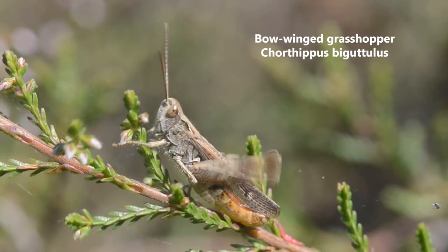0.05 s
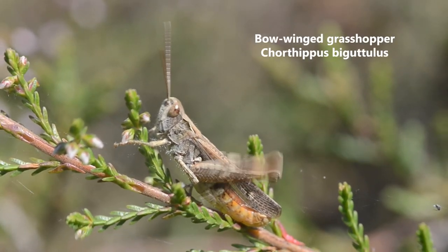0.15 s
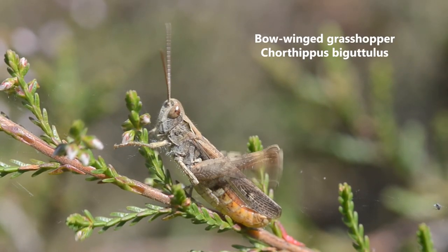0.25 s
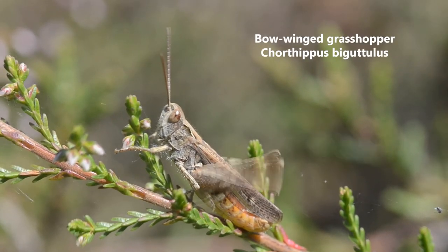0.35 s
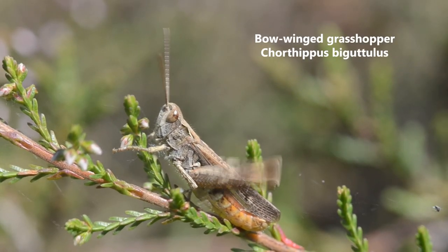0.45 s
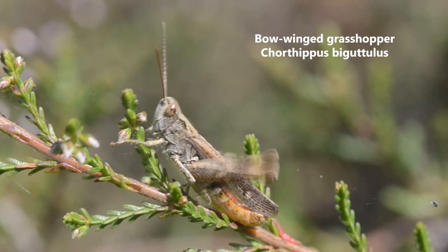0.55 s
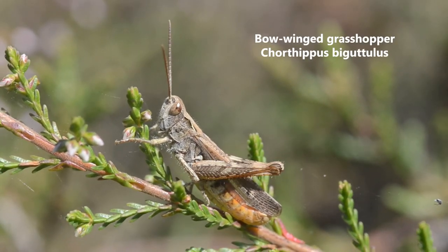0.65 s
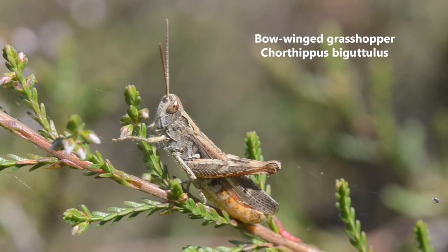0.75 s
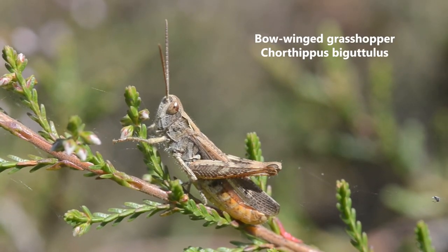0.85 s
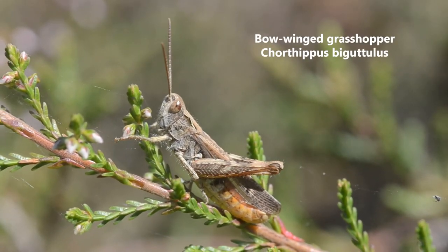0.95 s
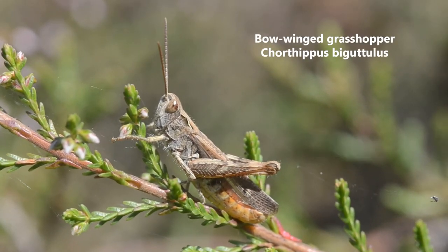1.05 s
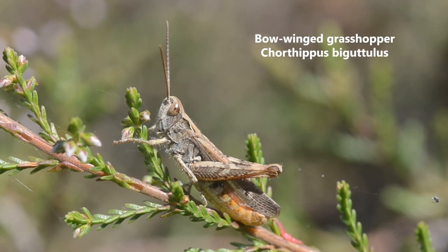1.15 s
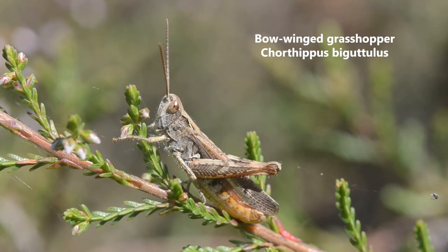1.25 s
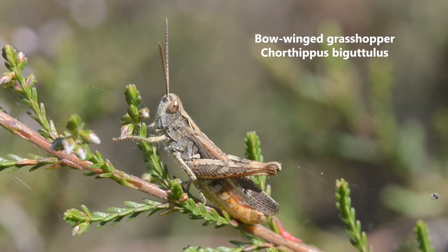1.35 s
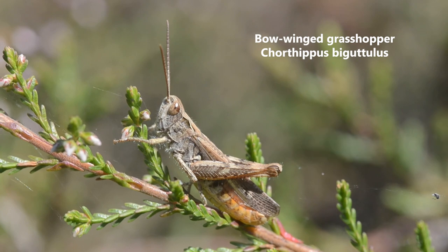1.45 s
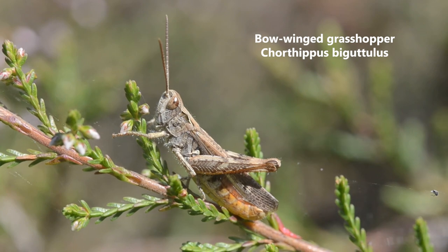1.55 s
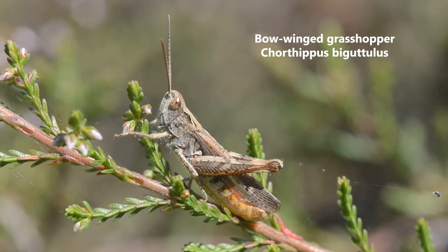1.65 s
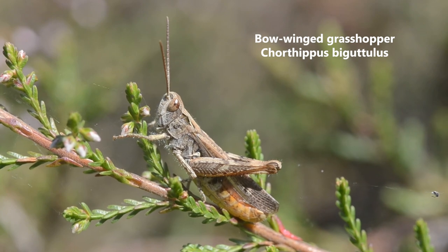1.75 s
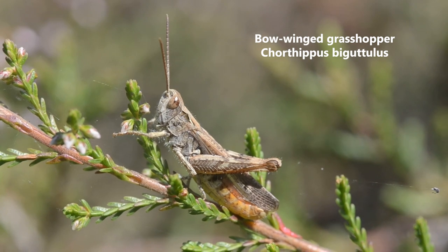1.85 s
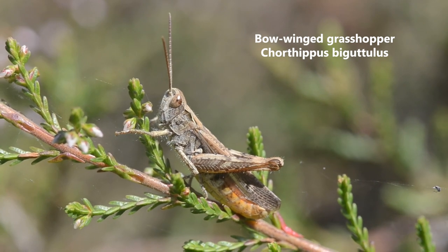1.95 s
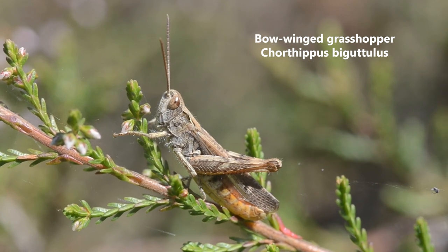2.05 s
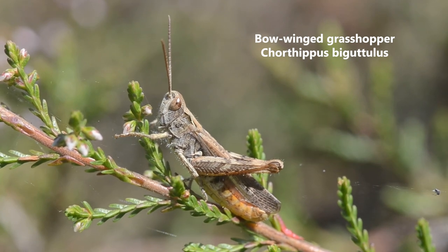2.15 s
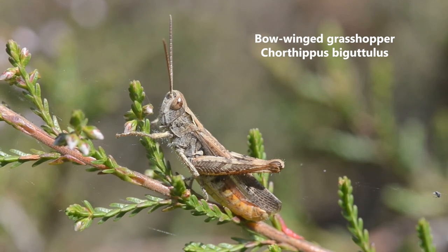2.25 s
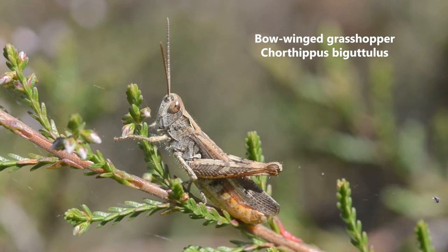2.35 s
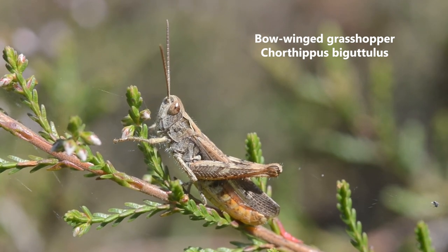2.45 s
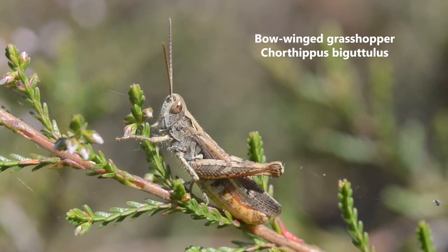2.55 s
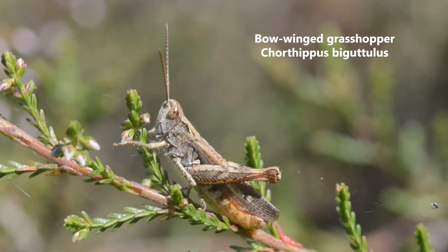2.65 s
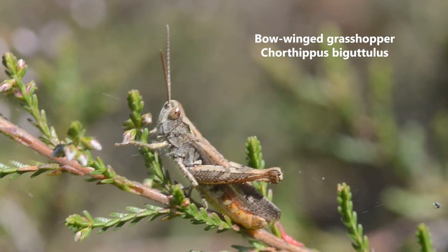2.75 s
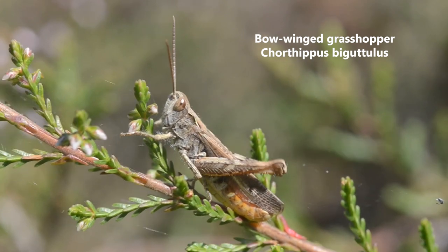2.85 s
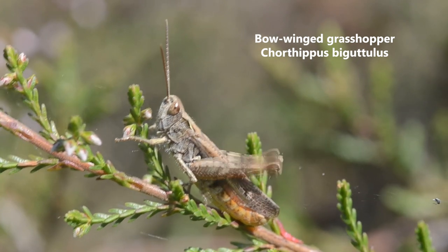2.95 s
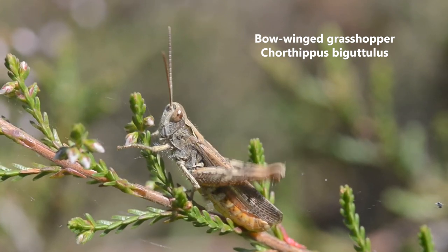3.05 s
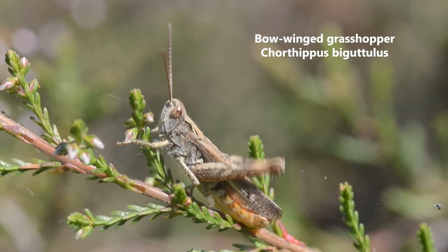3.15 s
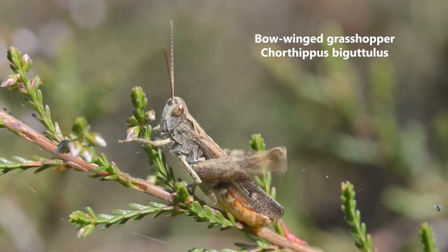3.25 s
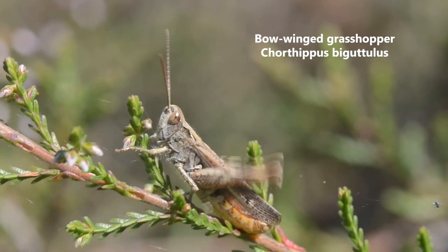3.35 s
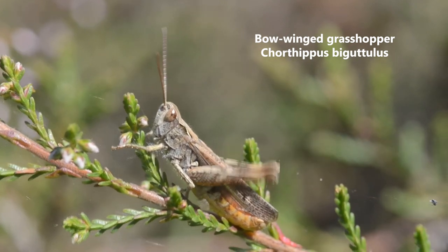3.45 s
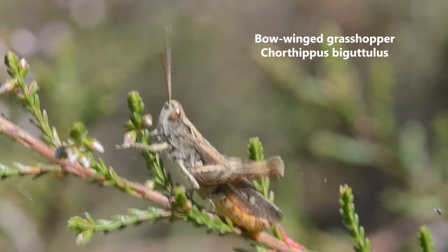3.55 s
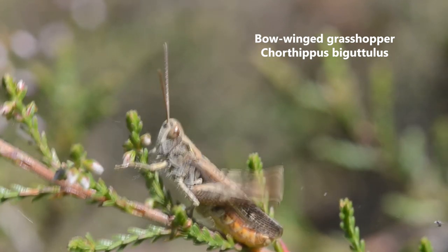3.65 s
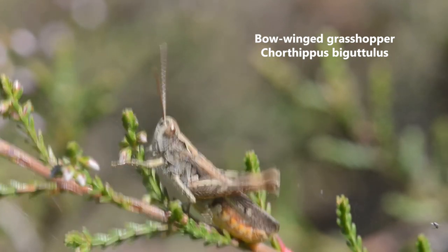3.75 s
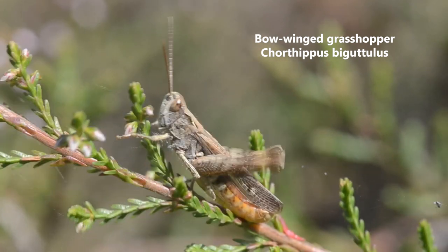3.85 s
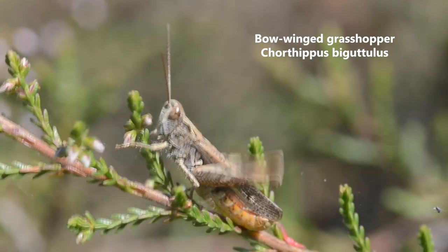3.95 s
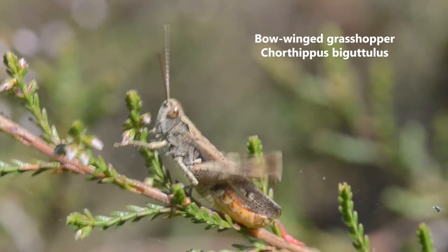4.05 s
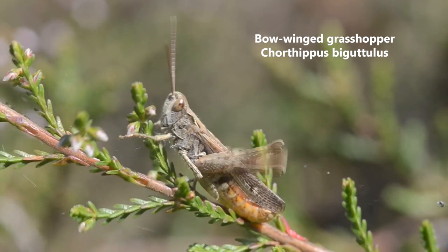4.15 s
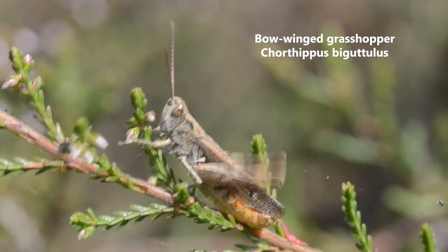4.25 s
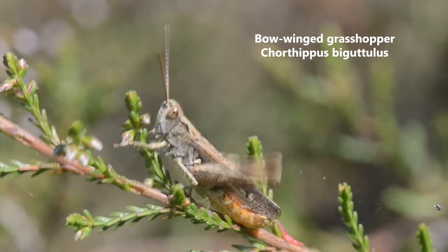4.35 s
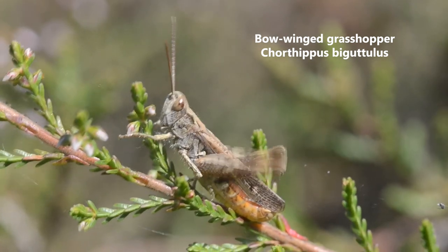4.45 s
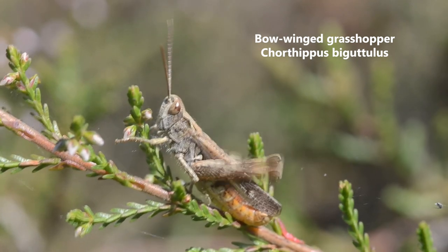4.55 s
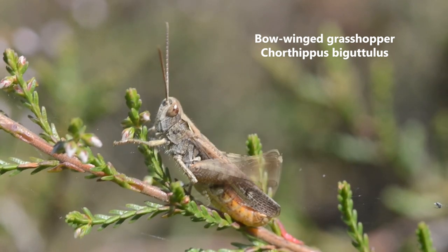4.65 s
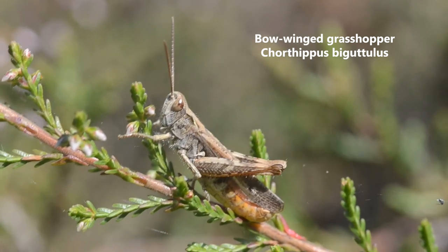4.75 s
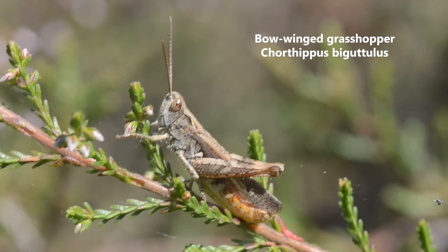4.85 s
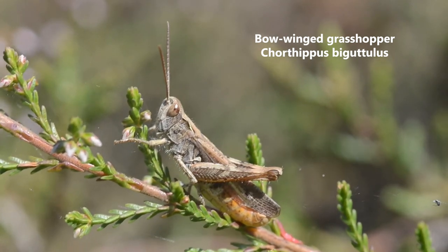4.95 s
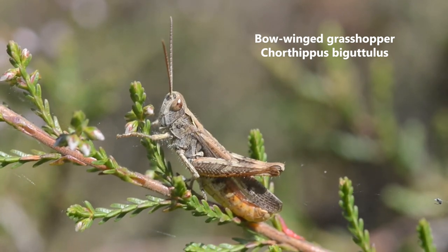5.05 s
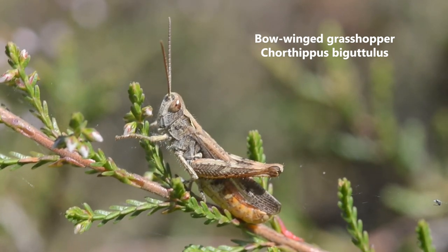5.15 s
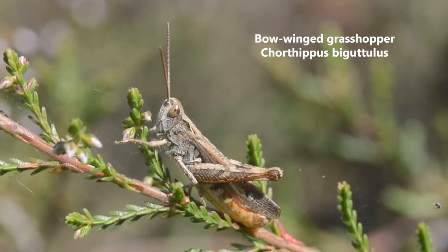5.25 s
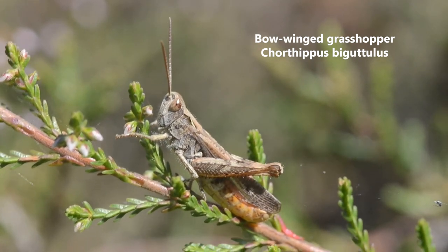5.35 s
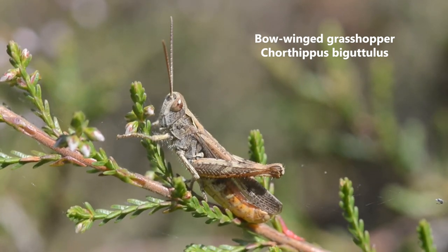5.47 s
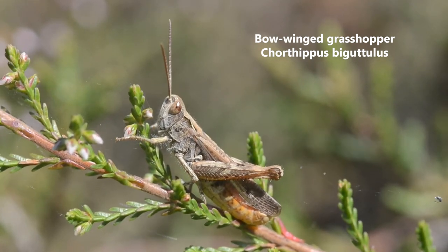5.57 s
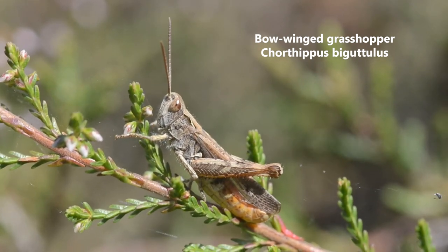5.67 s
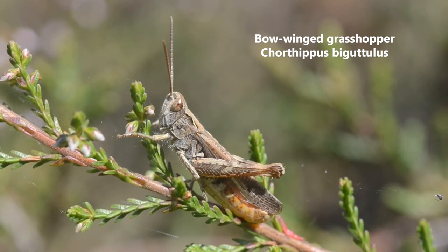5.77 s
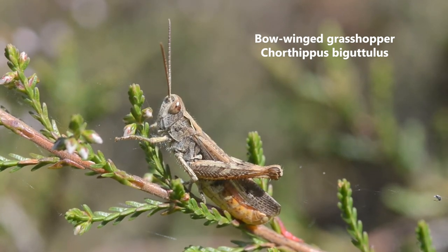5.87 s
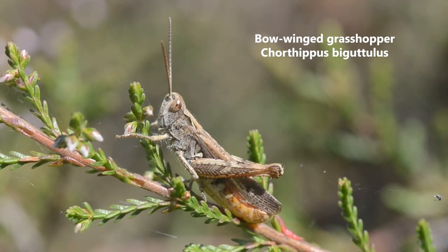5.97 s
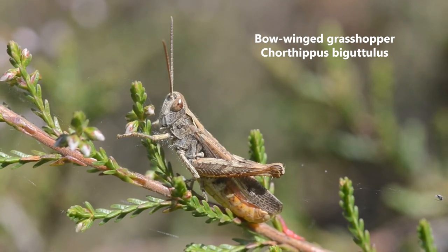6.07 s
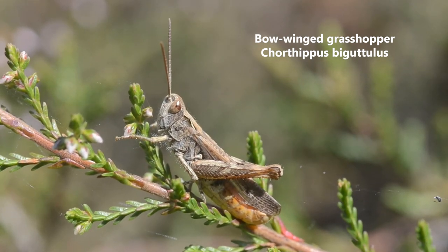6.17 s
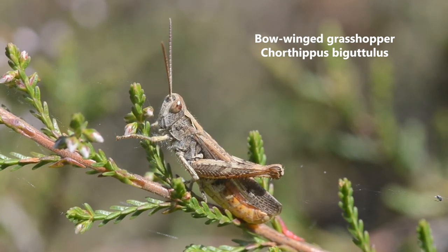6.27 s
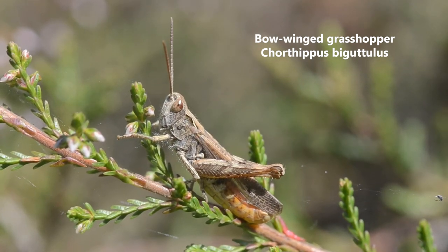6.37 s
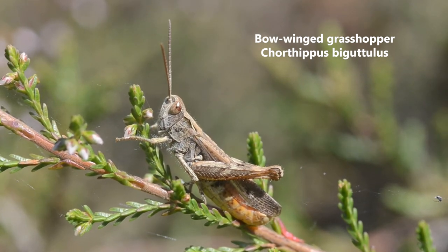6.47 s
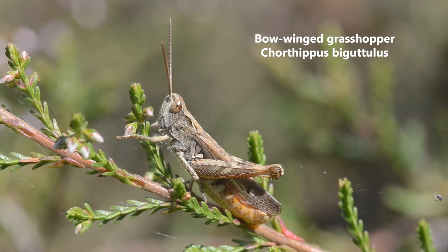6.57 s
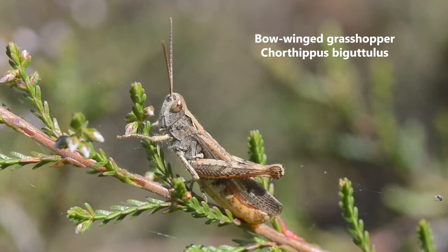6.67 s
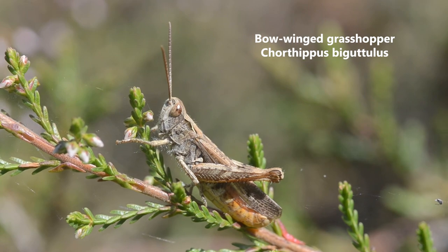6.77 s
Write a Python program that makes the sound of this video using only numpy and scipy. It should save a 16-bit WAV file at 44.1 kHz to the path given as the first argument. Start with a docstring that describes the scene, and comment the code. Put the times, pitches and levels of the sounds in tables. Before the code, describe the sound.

Dry, high pulsing grasshopper song outdoors: the tail of one phrase, a quiet gap, then another growing from faint scratches to a hard buzz.

```python
"""First heard is the end of a close grasshopper's phrase; a second phrase then swells and stops dead.
Stridulation: hind-leg pegs rub the wing veins, one hard whistle a syllable and then lighter scratches,
played by two legs slightly out of step. A rival nearby outlasts the first phrase by the same mechanism.
Faint neighbours and a distant chorus (shaped noise), a bird's falling sine and two damped low knocks
come from across the heath, over the steady stereo hiss and low rumble of filtered noise."""
import sys
import numpy as np
from scipy import signal
from scipy.fft import rfft, irfft, next_fast_len
from scipy.io import wavfile
from scipy.ndimage import uniform_filter1d, map_coordinates

SR = 44100
rng = np.random.default_rng(int(sys.argv[2]) if len(sys.argv) > 2 else 0)


def unload_wav(signal):
    """Save mono or channel-first audio to the path in sys.argv[1] as 16-bit WAV at rate SR, clipped to [-1, 1]."""
    wavfile.write(
        sys.argv[1],
        SR,
        np.round(np.clip(np.atleast_2d(signal).T, -1, 1) * 32767).astype(np.int16),
    )


N = 300321


def amp(db):
    """Decibel law: a level in dB as an amplitude ratio."""
    return 10 ** (np.asarray(db) / 20)


def unit(x, axis=None):
    """Normalisation by effective value: x scaled to rms 1."""
    return x / np.sqrt(np.mean(x ** 2, axis=axis, keepdims=True) + 1e-20)


def along(points, hz):
    """Logarithmic frequency scale: (frequency [Hz], value) points interpolated at hz."""
    f, v = np.transpose(points)
    return np.interp(np.log(hz + 1), np.log(f + 1), v)


def wobble(rate):
    """Slow random modulation: a smooth curve through rate random knots a second."""
    knots = rng.standard_normal(int(N * rate / SR) + 4)
    return map_coordinates(knots, [np.arange(N) * rate / SR])


def filtered(x, response):
    """Linear filtering: the spectrum of x times a complex response of frequency."""
    m = next_fast_len(N + SR // 2)
    return irfft(rfft(x, m) * response(np.fft.rfftfreq(m, 1 / SR)), m)[..., :N]


def placed(starts, sounds):
    """Superposition: the rows of sounds add, each beginning at its own time."""
    index = np.round(starts * SR).astype(int)[:, None] + np.arange(sounds.shape[1])
    inside = (index >= 0) & (index < N)
    return np.bincount(index[inside], sounds[inside], N)


# phrases sung with both legs: (start [s], end of light strokes [s], number of syllables,
# syllable period at full pace [s], lengthening at the end [s])
PHRASES = [(-1.1438, .623, 30, .05774, .00425), (2.9676, 4.727, 30, .05728, .00782)]
# trailing leg against the leading one, one row a phrase: (level [dB])
SECOND_LEG_DB = [-6, -4.5]


def grasshopper():
    """Superposition in time: the close singer's phrases add up to the main song."""
    return sum(phrase(*row, second_db) for row, second_db in zip(PHRASES, SECOND_LEG_DB))


# extra period at the start [s]; time constants of quickening and flagging [syllables]
SLOW_START_S, WARM_SYLLABLES, TIRE_SYLLABLES = .00506, 4.384, 3.602
SWELL_SYLLABLES = 17.2  # growth to full force [syllables]
# full level [dB], how much softer the start is [dB], bend of the swell, loss when tired [dB]
ACCENT_DB, ACCENT_SWELL_DB, ACCENT_BEND, ACCENT_TIRED_DB = -33, 25, 3.1, 1.5
LIGHT_DB, LIGHT_SWELL_DB, LIGHT_BEND, LIGHT_TIRED_DB = -38, 23, 2.6, 2.2
# reference peg rate after the swell, and how much lower a phrase starts [Hz]
PEG_HZ, PEG_SWELL_HZ = 8170, 1463
# chance differences between syllables: accent level [dB], peg rate [share]
SCATTER_DB, PEG_SCATTER = 0.4, 0.014
# pegs skip part-way up the swell: usual and added roughness [0-1], centre and width [syllables]
ROUGH, SKIP_ROUGH, SKIP_AT, SKIP_WIDTH = 0.17, 0.68, 5.7, 3.2
SKIP_DROP_HZ = 342  # fall in the reference peg rate where the pegs skip [Hz]


def phrase(start, halt, count, period, slowing, second_db):
    """Growth and fatigue: force and leg speed swell; the pace quickens, then flags."""
    k = np.arange(count)
    tired = np.exp(-np.maximum(count - 2 - k, 0) / TIRE_SYLLABLES)
    periods = period + SLOW_START_S * np.exp(-k / WARM_SYLLABLES) + slowing * tired
    onsets = start + np.cumsum(periods) - periods
    slack = np.clip(1 - k / SWELL_SYLLABLES, 0, 1)
    force, speed = rng.standard_normal((count, 2)).T

    accent_db = ACCENT_DB - ACCENT_SWELL_DB * slack ** ACCENT_BEND
    accent_db += -ACCENT_TIRED_DB * tired + SCATTER_DB * force
    light_db = LIGHT_DB - LIGHT_SWELL_DB * slack ** LIGHT_BEND - LIGHT_TIRED_DB * tired

    skipping = np.exp(-((k - SKIP_AT) / SKIP_WIDTH) ** 2)
    peg_hz = PEG_HZ - PEG_SWELL_HZ * slack - SKIP_DROP_HZ * skipping
    peg_hz = peg_hz * (1 + PEG_SCATTER * speed)
    rough = ROUGH + SKIP_ROUGH * skipping
    return syllables(onsets, periods, accent_db, light_db, peg_hz, second_db, rough, halt)


# force of each leg's successive light strokes in a syllable: (relative level [dB])
LEAD_DB = [3.5, -1.5, -3, 1.5, -2.5, -11.5]
TRAIL_DB = [1.5, -1, 1, -1, -1.5, -2]
# radiation of the wing under each leg: (frequency [Hz], relative level [dB])
LEAD_WING = [(1200, -75.5), (2600, -40), (3600, -28.5), (4650, -20.5), (4900, -5), (5450, -1.5), (6400, 0),
             (7400, 0.5), (8400, 0.5), (9400, -6), (10500, -10), (12000, -22.5), (13000, -43)]
TRAIL_WING = [(1200, -75.5), (2500, -28), (3200, -24), (4000, -13), (4650, -10.5), (5100, -5.5), (6400, -3),
              (7400, -5), (8400, -5), (9400, -3.5), (10500, -17.5), (12000, -22.5), (13000, -39)]
# dull rub of a leg whose pegs do not bite yet: (frequency [Hz], relative level [dB])
RUB = [(1200, -21), (2700, -20), (3200, -8.5), (4200, -4.5), (5500, -7), (8000, -20.5)]
# time between strokes and length of the hard stroke [share of the syllable period]
STROKE_SHARE, ACCENT_SHARE = 0.14, .118


def syllables(onsets, periods, accent_db, light_db, peg_hz, second_db, rough, halt):
    """Two sources out of step: one leg adds the accent, and each leg sounds through its own wing."""
    step = STROKE_SHARE * periods
    # the power of the light strokes is shared between the legs
    leg_db = light_db - 10 * np.log10(1 + amp(second_db) ** 2)
    accents = strokes(onsets - .0003, accent_db, peg_hz * 1.05, ACCENT_SHARE * periods, rough, LEAD_WING)
    leading = light_strokes(onsets + step, leg_db, peg_hz, step, LEAD_DB, LEAD_WING, halt)
    trailing = light_strokes(onsets + .0052, leg_db + second_db, peg_hz, step, TRAIL_DB, TRAIL_WING, halt)
    # the more the pegs skip, the more dull rubbing is heard
    rub_db = (accent_db + light_db) / 2 - 38.5 + 22 * rough
    rubbing = light_strokes(onsets, rub_db, peg_hz, step, LEAD_DB, RUB, halt)
    return accents + leading + trailing + rubbing


def light_strokes(onsets, db, peg_hz, step, pattern_db, wing, end, fill=1.114):
    """Repeated excitation: a run of scratchy up and down strokes fills each syllable."""
    late, force, speed = rng.standard_normal((len(onsets), 3, len(pattern_db))).transpose(1, 0, 2)
    starts = onsets[:, None] + step[:, None] * np.arange(len(pattern_db)) + 0.001 * late
    length = fill * step[:, None] * np.ones_like(starts)
    levels = db[:, None] + pattern_db + 0.83 * force
    # strokes centred past the end are silent
    levels = np.where(starts + length / 2 < end, levels, -np.inf)
    rates = peg_hz[:, None] * (1.171 + 0.0585 * speed)
    return strokes(starts.ravel(), levels.ravel(), rates.ravel(), length.ravel(), rough=0.65, wing=wing)


def strokes(starts, db, peg_hz, length, rough, wing, size=640):
    """Stridulation: pegs hit the vein at a rate that rises and falls with the speed of the leg."""
    columns = np.broadcast_arrays(db, peg_hz, length, np.clip(rough, 0, 1))
    db, peg_hz, length, rough = (c[:, None] for c in columns)
    shake, grip, scrape = rng.standard_normal((len(starts), 3, size)).transpose(1, 0, 2)
    margin = .001  # silence before the stroke [s]
    u = np.clip((np.arange(size) / SR - margin) / length, 0, 1)

    # the leg gathers speed through most of the stroke, then brakes
    speed = np.sin(np.pi * u ** 1.348)
    jitter = 0.048 * unit(uniform_filter1d(shake, size=24))
    rate = peg_hz * (1 - .31 * (1 - speed) + jitter)
    turns = np.cumsum(rate, axis=1) / SR + rng.random((len(starts), 1))
    whistle = np.sqrt(2) * np.sin(2 * np.pi * turns)

    # the pressure of the leg on the vein flutters
    flutter_db = (0.5 + 1.5 * rough) * unit(uniform_filter1d(grip, size=22))
    pressure = np.sin(np.pi * u).clip(0) ** 0.48 * amp(flutter_db)
    # skipping pegs turn the whistle into a scratch
    force = pressure * (np.sqrt(1 - rough) * whistle + 2 * np.sqrt(rough) * scrape)

    # a slow leg sounds darker, a fast one brighter
    hz = np.fft.rfftfreq(size, 1 / SR)
    tilt_db = 24 * np.log2(peg_hz / 8150) * np.log2(np.maximum(hz, 3300) / 7000)
    sound = irfft(rfft(force) * amp(along(wing, hz) + tilt_db), size)
    # longer strokes carry more energy
    return placed(starts - margin, amp(db) * unit(sound, axis=1) * np.sqrt(length * SR / size))


# the rival's phrase: (first syllable [s], leg halts [s], syllable period [s])
RIVAL = (.0097, .889, .0667)
# force of his successive light strokes in a syllable: (relative level [dB])
RIVAL_STROKES_DB = [-1.5, 0.5, .5, 0, -4.5, -12.5]
# radiation of his wing: (frequency [Hz], relative level [dB])
RIVAL_WING = [(1500, -58), (3000, -24), (4650, -22.5), (4950, -7.5), (6400, 0), (7200, -0.5), (8200, -5),
              (9500, -3.5), (10000, -12), (12000, -24)]
# hard and light strokes [dB], reference peg rate [Hz], roughness of the hard stroke [0-1]
RIVAL_ACCENT_DB, RIVAL_LIGHT_DB, RIVAL_PEG_HZ, RIVAL_ROUGH = -46, -52.5, 6920, 0.083
RIVAL_STEP_S, RIVAL_ACCENT_S = .0092, .0088  # time between strokes, length of the hard stroke


def rival():
    """Stridulation at a slower period: a second male's hard strokes, each with separate light ones."""
    start, halt, period = RIVAL
    onsets = np.arange(start, halt, period)
    each = np.ones(len(onsets))
    accents = strokes(onsets, RIVAL_ACCENT_DB * each, 1.075 * RIVAL_PEG_HZ, RIVAL_ACCENT_S,
                      RIVAL_ROUGH, RIVAL_WING)
    step = RIVAL_STEP_S * each
    light = light_strokes(onsets + step, RIVAL_LIGHT_DB * each, RIVAL_PEG_HZ * each, step,
                          RIVAL_STROKES_DB, RIVAL_WING, halt, fill=1.0)
    return accents + light


# neighbours' phrases: (first syllable [s], last syllable [s], syllable period [s],
# starting level [dB over NEIGHBOUR_DB], final level [dB over NEIGHBOUR_DB])
NEIGHBOURS = [(.956, 1.545, .0654, -3, 0), (4.82, 5.645, .0631, -2, 0), (5.71, 6.415, .0538, -6, -2),
              (6.482, 6.725, .0605, -2, -1)]
# song that has come through the heather: (frequency [Hz], relative level [dB])
FAR_SONG = [(1500, -51), (3000, -25), (5000, -10.5), (6400, 0), (7400, -1.5), (8600, -9), (10000, -13.5),
            (12500, -26.5)]
NEIGHBOUR_DB = -75


def neighbours():
    """Transmission loss: the same song dulled by the heather, each phrase growing as it goes."""
    rows = []
    for first, last, period, from_db, to_db in NEIGHBOURS:
        onsets = first + period * np.arange(round((last - first) / period) + 1)
        rows.append([onsets, NEIGHBOUR_DB + np.linspace(from_db, to_db, len(onsets))])
    onsets, db = np.concatenate(rows, axis=1)
    peg_hz, step = np.full(len(onsets), 7900.), np.full(len(onsets), .0086)
    accents = strokes(onsets, db, peg_hz, length=0.0073, rough=0.9, wing=FAR_SONG)
    return accents + light_strokes(onsets + step, db - 8.5, peg_hz, step, LEAD_DB, FAR_SONG, N / SR)


# falling note: (time [s], length [s], first pitch [Hz], last pitch [Hz], level [dB])
BIRD = [(5.19, .042, 2950, 2050, -77)]


def bird():
    """Frequency glide: one far whistle is a sine whose pitch falls steadily."""
    out = np.zeros(N)
    for start, length, from_hz, to_hz, db in BIRD:
        u = np.clip((np.arange(N) / SR - start) / length, 0, 1)
        turns = np.cumsum(from_hz + (to_hz - from_hz) * u) / SR
        out += amp(db) * np.sin(np.pi * u) * np.sin(2 * np.pi * turns)
    return out


# knocks in the undergrowth: (time [s], pitch [Hz], level [dB], 60 dB decay time [s])
KNOCKS = [(3.09, 275, -75, .2), (3.095, 440, -73, .2)]


def knocks():
    """Damped resonance: soft, low sines with a rounded onset and exponential decay."""
    out = np.zeros(N)
    for start, hz, db, t60 in KNOCKS:
        t = np.maximum(np.arange(N) / SR - start, 0)
        out += amp(db - 60 * t / t60) * (1 - np.exp(-t / 0.0031)) * np.sin(2 * np.pi * hz * t)
    return out


def heath(x, t60, wet_db):
    """Diffuse scattering: twigs and ground return a short, weak tail, different at each ear."""
    t = np.arange(SR // 3) / SR
    tail = unit(rng.standard_normal((2, len(t))) * amp(-60 * t / t60), axis=1) / np.sqrt(len(t))
    return amp(wet_db) * signal.fftconvolve(x[None], tail, axes=1)[:, :N]


# left-right likeness of diffuse noise: (frequency [Hz], correlation [-1 to 1])
ALIKE = [(60, 0.93), (270, 0.66), (600, 0.68), (1230, 0.68), (2600, 0.6), (5600, 0.43), (11000, 0.088)]


def rush(spectrum):
    """Partial coherence: diffuse stereo noise of rms 1 from independent mid and side parts."""
    def response(hz):
        turn = np.arccos(np.clip(along(ALIKE, hz), -1, 1)) / 2
        return amp(along(spectrum, hz)) * [np.cos(turn), np.sin(turn)]

    mid, side = filtered(rng.standard_normal((2, N)), response)
    return unit(np.array([mid + side, mid - side]))


# spectra of the open air and the rumble: (frequency [Hz], relative level per Hz [dB])
AIR = [(240, -41), (440, -18.5), (540, -4.5), (760, -2.5), (990, 1.2), (1320, -0.5), (1620, -6),
       (2250, -11.5), (3100, -16.5), (4700, -19.5), (7100, -23), (10100, -28.5), (12300, -30)]
RUMBLE = [(10, 4), (22, 10.5), (32, -6), (90, -1.5), (200, -3), (420, -4.5), (700, -32), (1500, -51)]
# blurred phrases of grasshoppers farther off: (start [s], end [s], level [dB])
FAR_PHRASES = [(0, 1.5, -82), (1.91, 2.07, -86), (2.28, 2.38, -85), (2.53, 2.64, -91), (2.88, 5.8, -84.5),
               (6.1, 6.74, -88)]
FAR_FADE_S, CHORUS_DB = .08, -94.5  # fade of these phrases; steady blend of the farthest singers


def background():
    """Power addition of incoherent sources: hiss of the open air, low rumble and far chorus."""
    air = amp(-67.55 + 0.3 * wobble(1.3)) * rush(AIR)
    t = np.arange(N) / SR
    power = amp(CHORUS_DB) ** 2
    for start, end, db in FAR_PHRASES:
        gate = np.clip(.5 + np.minimum(t - start, end - t) / FAR_FADE_S, 0, 1)
        power = power + (amp(db) * gate) ** 2
    chorus = np.sqrt(power) * amp(2.1 * wobble(64)) * rush(FAR_SONG)
    return air + amp(-82.5) * rush(RUMBLE) + chorus


LEAD_S = 3.35e-5  # the close song reaches the left port this much earlier
GLANCE_S, GLANCE = .000625, .2  # reflection reaching the left port only: delay, strength [share]


def close_field(near):
    """Arrival-time difference and interference: the direct song plus one glancing reflection."""
    def response(hz):
        glance = 1 + GLANCE * np.exp(-2j * np.pi * hz * GLANCE_S) * np.array([[1], [0]])
        # half the lead advances the left port, half delays the right
        return glance * np.exp(1j * np.pi * hz * LEAD_S * np.array([[1], [-1]]))

    return filtered(near, response)


def scene():
    """Direct and scattered fields: a nearly dry singer, a rival with more tail, and the far heath."""
    near, other, far = grasshopper(), rival(), neighbours() + bird() + knocks()
    song = close_field(near) + heath(near, t60=.16, wet_db=-19.5)
    answer = other + heath(other, t60=.15, wet_db=-8.5)
    distant = far + heath(far, t60=0.28, wet_db=-8.5) + background()
    # left and right levels [dB]
    return song * amp([[-1.1], [1]]) + answer * amp([[-1.7], [1.5]]) + distant * amp([[-1.3], [1.1]])


# notches of the microphone housing: (frequency [Hz], width [Hz], depth [0-1])
PORT_NOTCHES = [(5713, 780, 0.8), (6846, 420, 0.8)]
TOP_HZ = 12250  # band limit


def record(dry):
    """Resonant absorption and band limiting: the housing cuts two notches, then the treble ends steeply."""
    def notch(hz, centre, width, depth):
        return 1 - depth * 1j * hz * width / (centre ** 2 - hz ** 2 + 1j * hz * width)

    coloured = filtered(dry, lambda hz: np.prod([notch(hz, *row) for row in PORT_NOTCHES], axis=0))
    return filtered(coloured, lambda hz: 1 / np.sqrt(1 + (hz / TOP_HZ) ** 160))


dry = scene()
out = record(dry)
unload_wav(out)
```